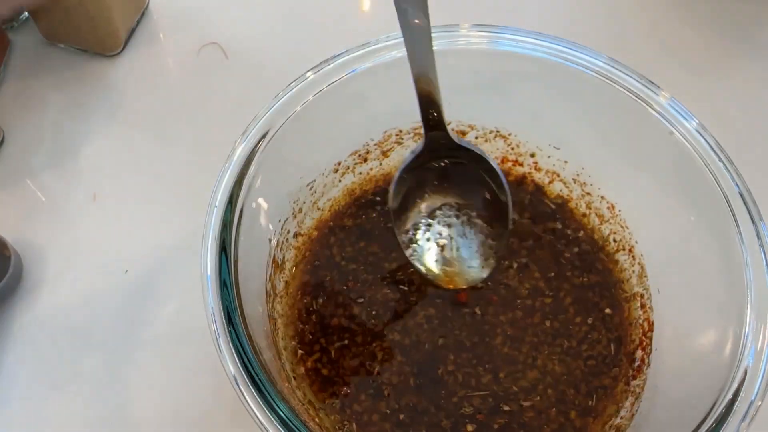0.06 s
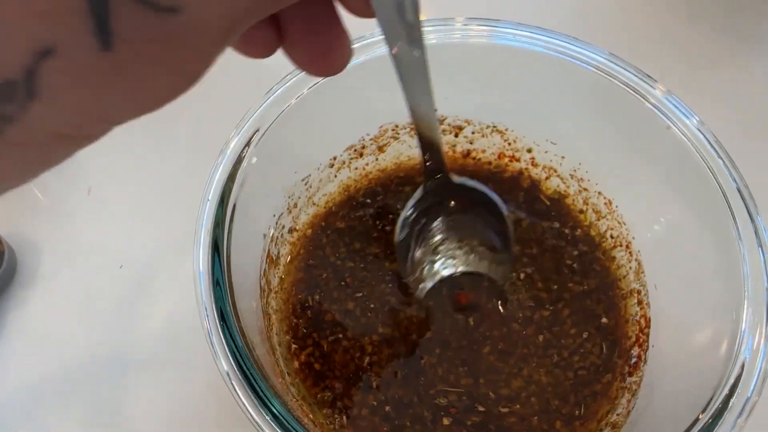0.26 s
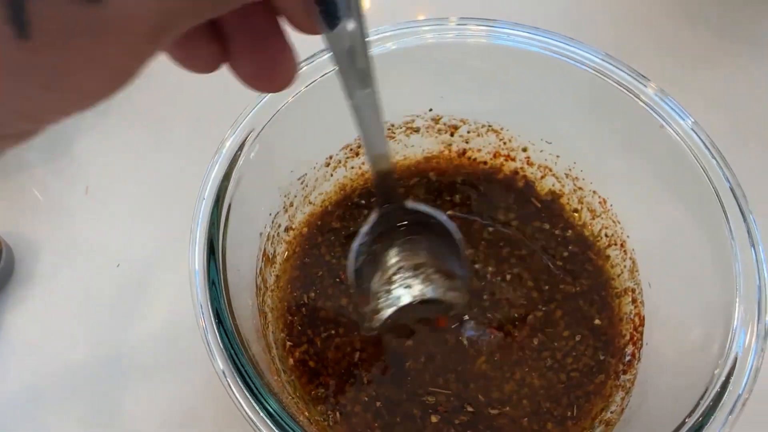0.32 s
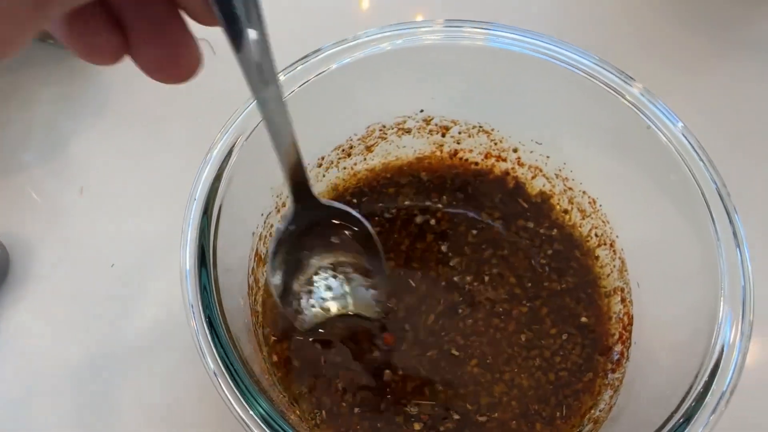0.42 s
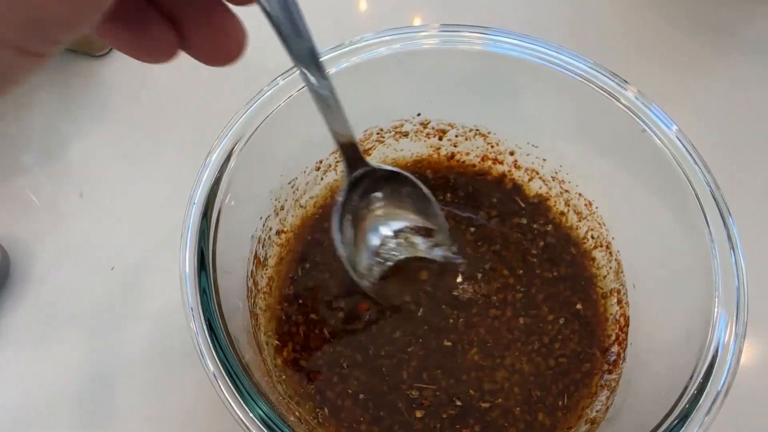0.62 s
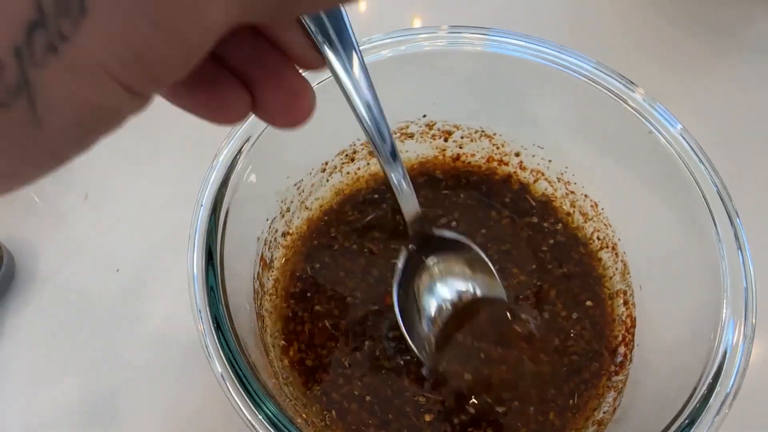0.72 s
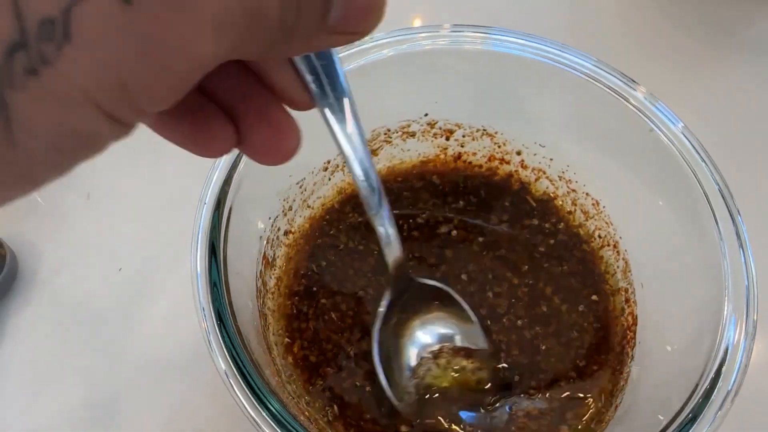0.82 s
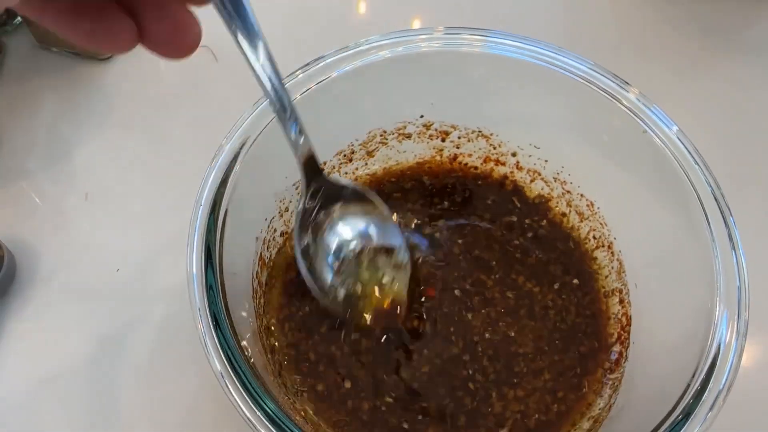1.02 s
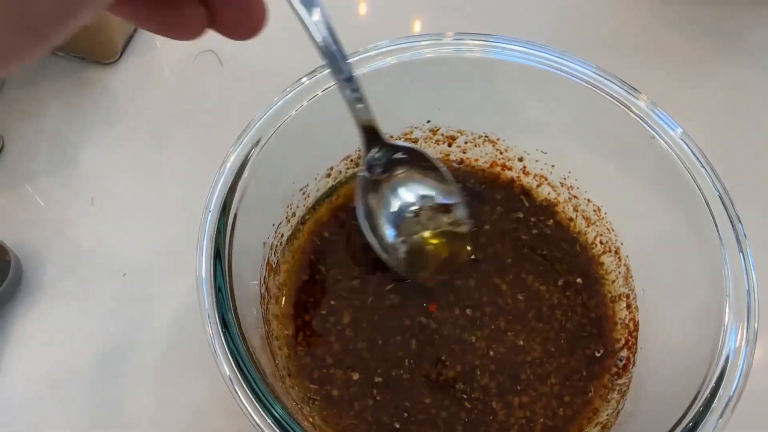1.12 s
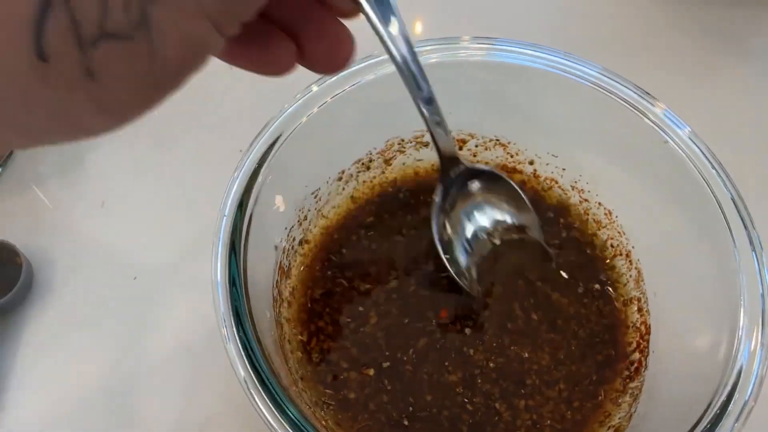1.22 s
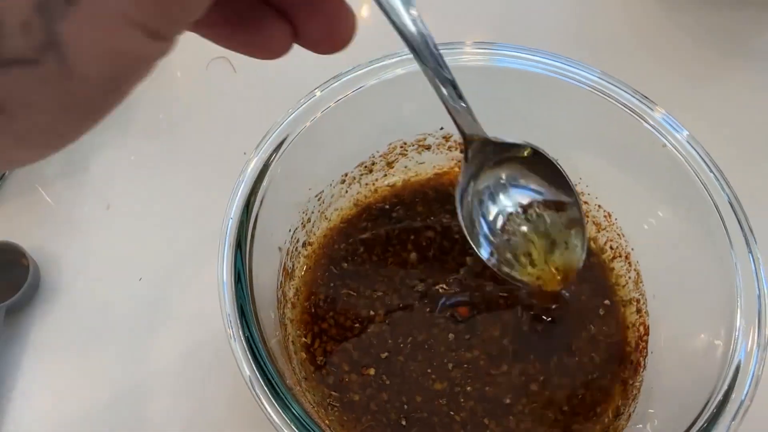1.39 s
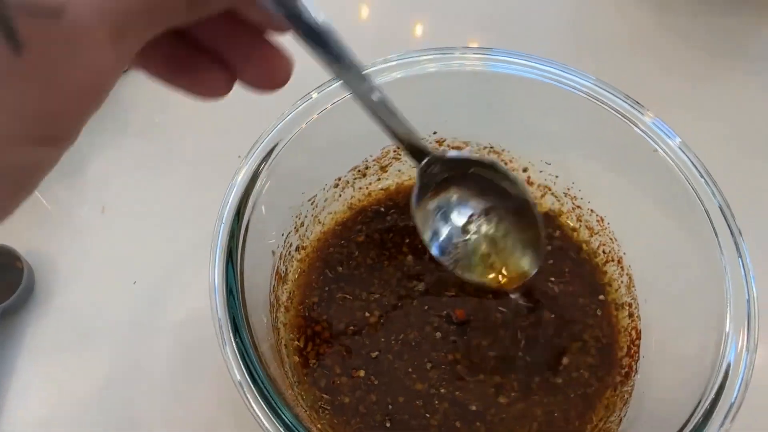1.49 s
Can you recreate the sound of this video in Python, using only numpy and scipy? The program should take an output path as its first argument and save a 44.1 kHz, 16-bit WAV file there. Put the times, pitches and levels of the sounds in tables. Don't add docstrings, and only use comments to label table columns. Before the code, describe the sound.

A steel spoon strikes a thick glass bowl at 0.2 s: a very loud, slightly overloaded bright clink with tiny rebounds, cut short, with a counter thump and hard kitchen echo. A much softer clink follows at 0.76 s, then faint taps and gritty scrapes from 1.0 s, another small tap at 1.33 s, and a low sauce slosh from 1.3 to 1.55 s. Unsteady low hum and steady air noise lie beneath.

```python
import sys
import numpy as np
from scipy import signal
from scipy.fft import rfft, irfft
from scipy.io import wavfile

SR = 44100
rng = np.random.default_rng(int(sys.argv[2]) if len(sys.argv) > 2 else 0)


def to_wav(s):
    ch = np.atleast_2d(s).T
    pcm = np.round(np.clip(ch, -1, 1) * 32767)
    wavfile.write(sys.argv[1], SR, pcm.astype(np.int16))


def invert_db(x):
    u = np.asarray(x, float) / 20
    return 10 ** u


N = 68355

# t/s, peak level/dB
KNOCK_HITS = [
    (0.2142, 1),
    (0.2163, -7.5),
    (0.2187, -9),
]
# f/Hz, level/dB, t60/s, left-right/dB
BOWL_MODES = [(847, -20, 0.061, -9), (986.6, -8.5, .05, 4), (1427, -16.5, 0.11, 5), (2050, -22, .03, 1),
              (2667, -2, 0.087, 4), (2856, -6.5, 0.02, 2), (3080, -15.5, .05, 22.5), (3260, -17, .04, 5),
              (3650, -15.5, .04, 5.5), (4115, -8.5, 0.046, 13), (4754, -17, .03, 11.5),
              (5475, -17.5, .03, 7.5), (6740, -19.5, 0.035, -6.5)]
# f/Hz, level/dB, t60/s, left-right/dB
SPOON_MODES = [(8240, -14, .02, 3.5), (8500, -16.5, .02, -7.5), (9310, -14, .025, -0.5),
               (9561, -4, 0.07, -2), (10690, -16.5, .02, -19.5), (11500, -23.5, 0.02, -3),
               (13200, -16, .03, -1.5), (15000, -17.5, .016, -3.5)]
# f/Hz, level/dB, t60/s, left-right/dB
COUNTER_MODES = [(62, -62.5, .3, 7), (109, -24.5, .09, 0), (218, -23.5, 0.052, -1.5),
                 (348, -34.5, 0.053, -13), (441, -34, 0.071, 2)]


def knock():
    contact_hz, glass_lag_s = 6650, 0.00033
    grip_s, grip_db_per_s, grip_floor_db = 0.2222, 3398, -16
    t = np.arange(N) / SR
    s, db = np.transpose(KNOCK_HITS)
    steel_hit = clicks(s[0], 0)
    glass_hit = cut(clicks(s + glass_lag_s, db + 13), contact_hz, "low")
    bowl = sum(pan(ring(glass_hit, hz, t60) * invert_db(level - 13.5), lr) for hz, level, t60, lr in BOWL_MODES)
    spoon = sum(pan(ring(steel_hit, hz, t60) * invert_db(level), lr) for hz, level, t60, lr in SPOON_MODES)
    grip = invert_db(np.clip(-grip_db_per_s * (t - grip_s), grip_floor_db, 0))
    counter = sum(pan(ring(glass_hit, hz, t60) * invert_db(level - 13), lr) for hz, level, t60, lr in COUNTER_MODES)
    return cut(bowl + spoon, 750, "high") * grip + counter


def crack():
    return cut(burst([KNOCK_HITS[0][0]], db=-21, t60=0.015), 130, "high")


# t/s, peak level/dB, brightness/dB, 2-3.3 kHz ring/dB, low ring/dB
TAP_EVENTS = [(0.713, -54, 0, -6.5, -3), (0.7649, -29.5, 0, 2, -5), (0.9455, -63.5, -2, -3, -4),
              (1.0109, -62.5, -5.5, -5, -1.5), (1.0281, -53, 0, 6, 8), (1.043, -59.5, 4.5, -4, -1),
              (1.0668, -55, 0.5, -9, 10), (1.0872, -56, -6, -6, 16), (1.097, -66.5, 0, -8, 5),
              (1.1698, -52.5, -1, -6.5, 15), (1.188, -48, 8.5, -6, 7), (1.2595, -61.5, 0, 0.5, 4),
              (1.3082, -51, 7.5, -3, -2), (1.3287, -37.5, 0.5, -5.5, -8)]
# f/Hz, level/dB, t60/s
WET_MODES = [(1250, -16.5, .025), (1730, -17, .02), (2371, -22.5, .02), (2583, -7.5, 0.059),
             (3080, -6.5, 0.023), (3500, -14.5, .01), (4290, -7.5, 0.012), (4660, -3.5, .012),
             (5630, -17.5, 0.0063), (7000, -15.5, 0.013), (8000, -18.5, 0.008), (9100, -16, .01),
             (12447, -18.5, .012), (14600, -21.5, .01)]
# t/s, level/dB
DRAG_LEVEL = [(0, -95.5), (.66, -89), (.72, -72), (.84, -75.5), (.9, -86), (1.0, -79), (1.04, -73.5),
              (1.11, -73), (1.14, -83), (1.18, -73), (1.23, -82), (1.32, -75), (1.38, -88), (1.55, -93.5)]


def stirring():
    grit_per_s, tap_spread_db = 1500, 6.5
    skid_s, skid_under_db = 0.005, -51
    tick_db, tick_t60_s = -8, 0.014
    hiss_db, hiss_low_hz, hiss_top_hz = -3.5, 5540, 12572
    s, db, bright, body, low = np.transpose(TAP_EVENTS)
    luck = rng.standard_normal((len(s), len(WET_MODES)))
    drag_db = in_time(DRAG_LEVEL)
    grit = (rng.random(N) < grit_per_s / SR) * invert_db(drag_db + 2.5 * rng.exponential(1, N))

    weak = np.clip((skid_under_db - db) / 6, 0, 1)
    weak_in_time = in_time(np.c_[s, weak])
    skid_shape = np.hanning(int(skid_s * SR))
    out = cut(burst(s, db + tick_db + bright, tick_t60_s), 1900, "high")
    for k, (hz, level_db, t60) in enumerate(WET_MODES):
        level = db + tap_spread_db * luck[:, k]
        level = level + bright * np.log2(hz / 4500) * (hz > 4500)
        level = level + body * (2000 < hz < 3300) + low * (hz < 2000)
        taps = clicks(s, level - 12 * weak)
        skids = signal.lfilter(skid_shape, [1], clicks(s, level - 14.5) * weak_in_time)
        skids = skids * rng.standard_normal(N)
        grains = grit * rng.standard_normal(N)
        out = out + invert_db(level_db) * ring(taps + skids + grains, hz, t60)

    hiss = cut(cut(rng.standard_normal(N), hiss_low_hz, "high"), hiss_top_hz, "low")
    out = out + invert_db(drag_db + hiss_db) * hiss
    return pan(cut(out, 1100, "high"), 7.5)


# t/s, level/dB
SLOSH_LEVEL = [(0, -85), (1.2, -79.5), (1.28, -67), (1.35, -57.5), (1.42, -56.5), (1.49, -54.5),
               (1.55, -60.5)]
# f/Hz, density/(dB per Hz)
SLOSH_SPECTRUM = [(60, -29), (110, -9.5), (200, -3.5), (310, 0), (450, -9), (780, -7.5), (1200, -18),
                  (2500, -35.5)]


def slosh():
    wash = bands(lambda hz: invert_db(at_hz(SLOSH_SPECTRUM, hz) + 2.0 * drift(15)))
    return invert_db(in_time(SLOSH_LEVEL)) * rms_one(cut(wash, 4000, "low"))


# t/s, level/dB
RUMBLE_LEVEL = [(0, -59.5), (.2, -79.5), (.3, -60), (.45, -52), (.55, -59.5), (.7, -51), (.85, -67.5),
                (1.2, -65), (1.27, -62.5), (1.36, -57), (1.43, -52.5), (1.55, -61.5)]


def rumble():
    centre_hz, width_hz = 66, 18
    hum = ring(rng.standard_normal(N), centre_hz, 5.4 / width_hz)
    return pan(invert_db(in_time(RUMBLE_LEVEL)) * rms_one(hum), 1.5)


# f/Hz, density/(dB per Hz)
AIR_SPECTRUM = [(40, -16.5), (65, -2.5), (250, -9), (600, -22.5), (1400, -18), (3000, -26.5), (5500, -34),
                (10500, -36.5)]


def air():
    level_db, top_hz = -63.5, 11600
    noise = bands(lambda hz: invert_db(at_hz(AIR_SPECTRUM, hz)))
    return pan(invert_db(level_db) * rms_one(cut(noise, top_hz, "low")), 2.5)


# f/Hz, t60/s, level/dB
KITCHEN_DECAY = [(100, 1.4, -10), (300, 1.2, -10.5), (604, 1.1, -18.5), (1091.4, 1.43, -18.5),
                 (2700, 1, -24.5), (5010, .8, -27.5), (9000, .55, -34.5), (15000, .35, -36.5)]


def kitchen(x):
    early_db, early_t60_s, predelay_s = 11, 0.1, 0.006
    t = np.arange(N) / SR
    early = invert_db(early_db - 60 * t / early_t60_s)

    def decay(hz):
        late = invert_db(-60 * t / at_hz(KITCHEN_DECAY, hz))
        return invert_db(at_hz(KITCHEN_DECAY, hz, column=2)) * (late + early)

    onset = np.clip(t / predelay_s - 1, 0, 1)
    tail = pan(bands(decay) * onset * invert_db(-29.5), 3.0)
    return signal.fftconvolve(x.mean(0, keepdims=True), tail, axes=1)[:, :N]


# f/Hz, likeness/1
STEREO_LIKENESS = [(60, 1), (180, 0.7), (550, 0.094), (1650, 0.07), (4970, 0.26), (15000, 0.15)]


def bands(gain_of_band):
    out = 0
    edges_hz = 30 * 2 ** np.arange(0, 9.1, 1 / 3)
    white = rng.standard_normal((2, 2, N))
    for k, (low, high) in enumerate(zip(edges_hz, edges_hz[1:])):
        band = signal.butter(2, [low, high], "band", fs=SR, output="sos")
        mid, side = signal.sosfilt(band, white[k % 2])
        hz = np.sqrt(low * high)
        alike = np.clip(at_hz(STEREO_LIKENESS, hz), -1, 1)
        stereo = np.sqrt(1 + alike) * mid + np.sqrt(1 - alike) * side * [[1], [-1]]
        out = out + gain_of_band(hz) * stereo
    return out


def clicks(s, db):
    out = np.full(N, 1e-18)
    out[(np.asarray(s) * SR).astype(int)] = invert_db(db)
    return out


def burst(s, db, t60):
    envelope = signal.lfilter([1], [1, -invert_db(-60 / (t60 * SR))], clicks(s, db))
    return envelope * rng.standard_normal(N)


def ring(x, hz, t60):
    r, w = invert_db(-60 / (t60 * SR)), 2 * np.pi * hz / SR
    return signal.lfilter([0, np.sin(w)], [1, -2 * r * np.cos(w), r * r], x)


def cut(x, hz, kind):
    return signal.sosfilt(signal.butter(4, hz, kind, fs=SR, output="sos"), x)


def pan(x, db):
    return x * invert_db([[db / 2], [-db / 2]])


def rms_one(x):
    return x / np.sqrt(np.mean(x ** 2) + 1e-20)


def in_time(rows):
    return np.interp(np.arange(N) / SR, *np.transpose(rows))


def at_hz(points, hz, column=1):
    points = np.array(points)
    return np.interp(np.log(hz), np.log(points[:, 0]), points[:, column])


def drift(rate_hz):
    r = np.exp(-80 * np.pi * rate_hz / SR)
    noise = rng.standard_normal(N // 40 + 2002)
    slow = signal.lfilter([1], [1, -2 * r, r * r], noise)[2000:]
    return np.interp(np.arange(N) / 40, np.arange(len(slow)), rms_one(slow))


def scene():
    left_leads_s = 4.5e-5
    ring_room_db, crack_room_db = -8, 20.5
    bowl = knock() + stirring()
    snap = crack()
    out = bowl + pan(snap, 3) + slosh() + rumble() + air()
    delay = np.exp(-2j * np.pi * np.fft.rfftfreq(N, 1 / SR) * left_leads_s)
    out[1] = irfft(rfft(out[1]) * delay, N)
    return out + kitchen(bowl * invert_db(ring_room_db) + snap * invert_db(crack_room_db))


def low_pass(x):
    return signal.sosfilt(signal.butter(12, 15590, fs=SR, output="sos"), x)


def record(dry):
    mic_low_hz, gain_db, full_scale = 55, -1, 1.0
    mix = cut(dry, mic_low_hz, "high") * invert_db(gain_db)
    return low_pass(np.clip(mix, -full_scale, full_scale))


dry = scene()
out = record(dry)
to_wav(out)
```